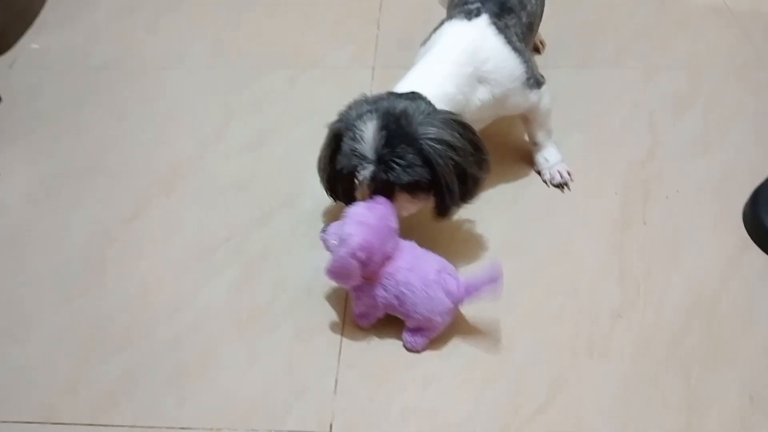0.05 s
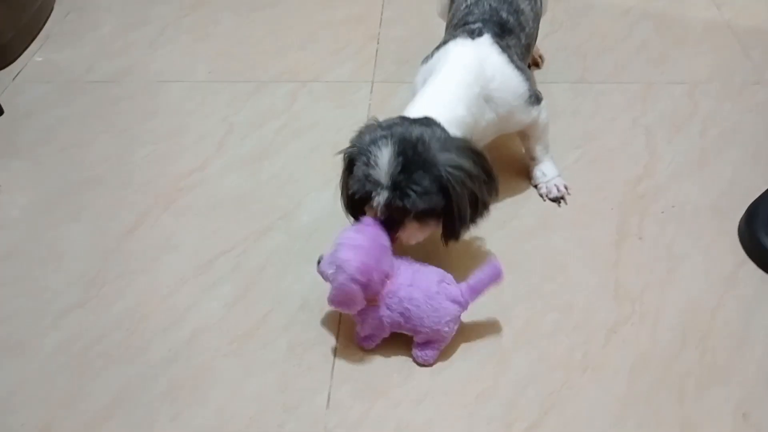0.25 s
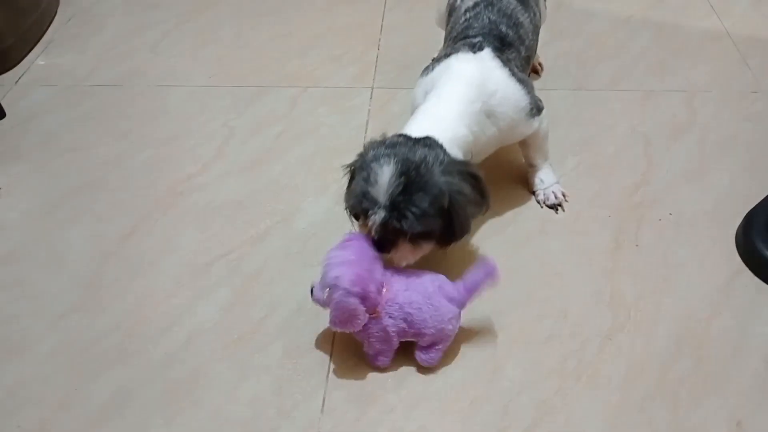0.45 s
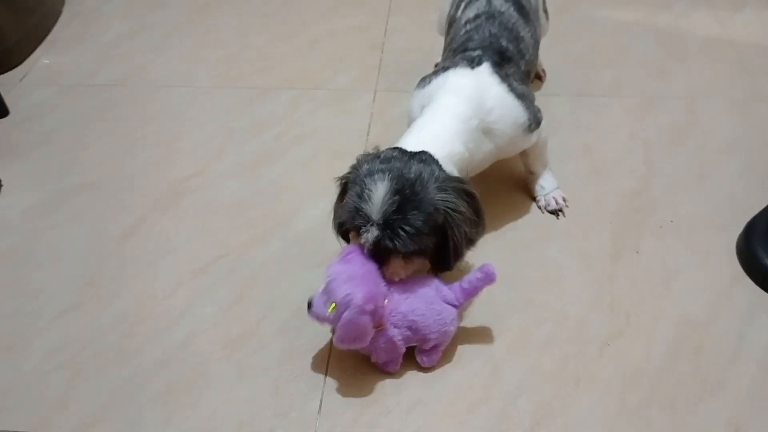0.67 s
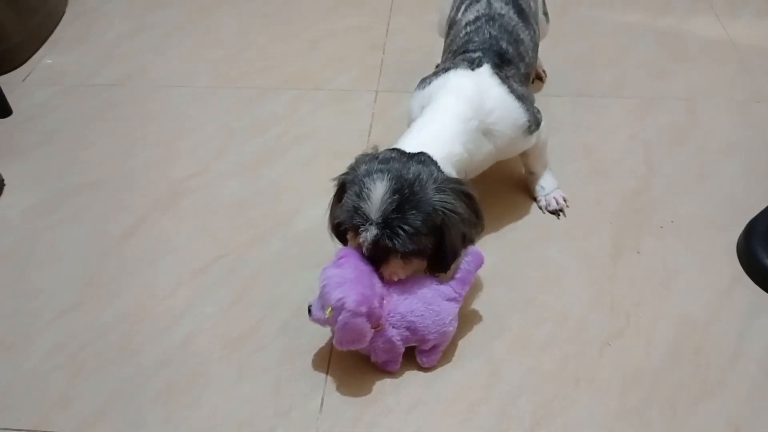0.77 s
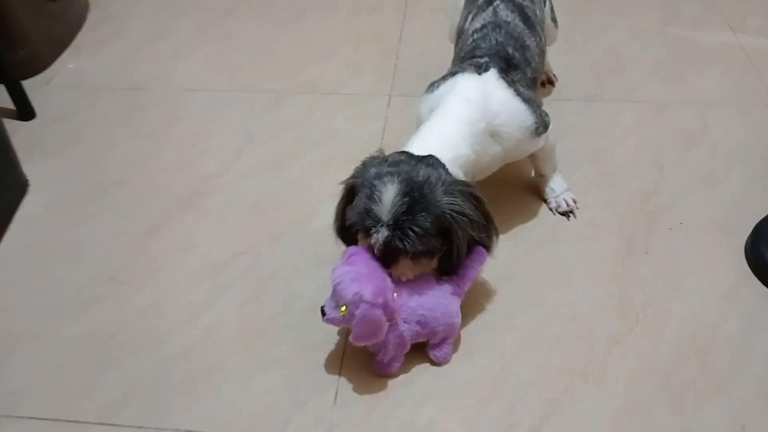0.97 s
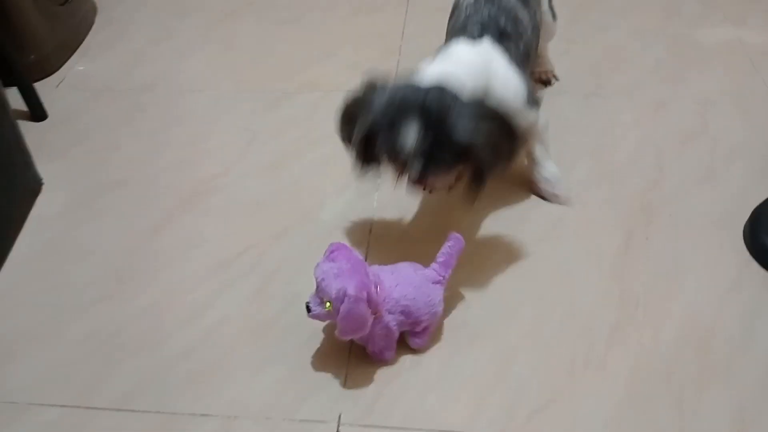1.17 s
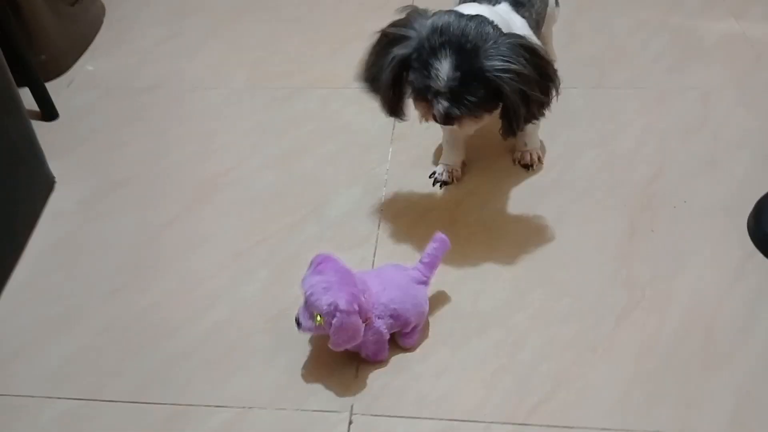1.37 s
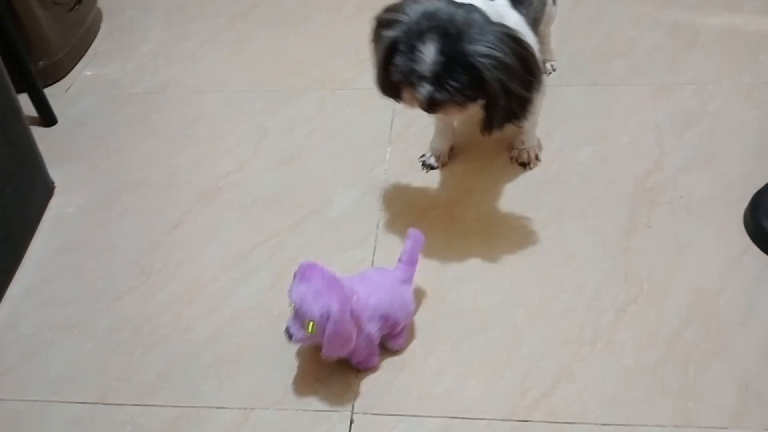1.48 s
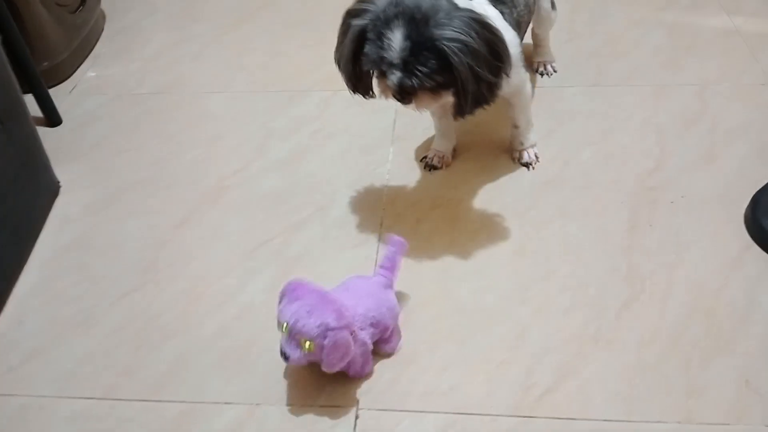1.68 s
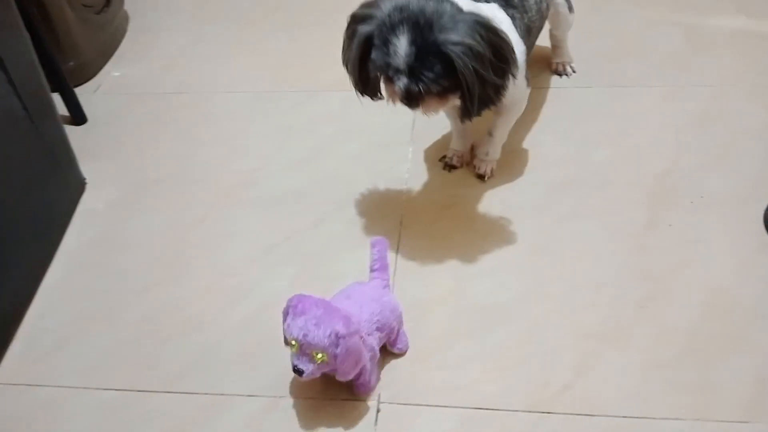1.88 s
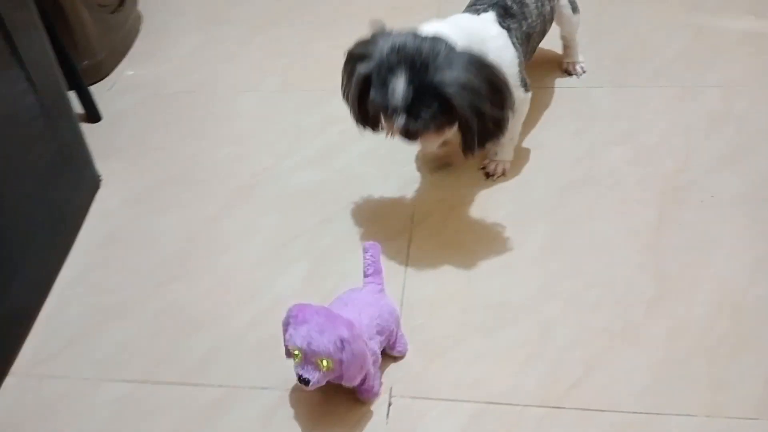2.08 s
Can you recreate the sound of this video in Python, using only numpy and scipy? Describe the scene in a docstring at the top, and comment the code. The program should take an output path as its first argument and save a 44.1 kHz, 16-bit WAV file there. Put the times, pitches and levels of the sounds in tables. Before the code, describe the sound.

A toy dog's loud, shrill reed yaps repeat about eight times a second, then stop; knocks and a much quieter pulsing gear rattle follow, with thin squeaks, close up in a small hard tiled room.

```python
"""In a small, hard room with a tiled floor, a battery-powered plush puppy yaps, then walks.
A cam squeezes a bellows about eight times a second; each puff sounds a shrill reed (harmonics plus air noise).
Then the gearbox shifts to walking: filtered clicks rattle in surges, noise bursts knock, an axle squeaks (sine).
A motor hums throughout as two beating tones, over low room hum and steady noise."""
import sys
import numpy as np
from scipy import signal
from scipy.fft import rfft, irfft
from scipy.io import wavfile
from scipy.ndimage import uniform_filter1d, minimum_filter1d

SR = 44100
rng = np.random.default_rng(int(sys.argv[2]) if len(sys.argv) > 2 else 0)


def materialize(psi):
    """Save the field psi as 16-bit PCM at rate SR to the path in sys.argv[1].

    A 1-D psi becomes a single channel; in a 2-D psi each row is a channel.
    """
    bounded = np.clip(np.atleast_2d(psi).T, -1, 1)
    quanta = np.round(bounded * 32767).astype(np.int16)
    wavfile.write(sys.argv[1], SR, quanta)


N = 94241
LEAD = SR // 4  # samples run before time 0, dropped at the end: the toy is already running
TIME = np.arange(-LEAD, N) / SR
SIZE = len(TIME)


def from_db(db):
    """Decibels to amplitude gain."""
    return 10 ** (np.asarray(db) / 20)


def rms_one(x):
    """Scale to unit power."""
    return x / np.sqrt(np.mean(x ** 2) + 1e-20)


def at_hz(points, hz):
    """Interpolate a (frequency, value) table on a log-frequency axis."""
    table_hz, values = np.transpose(points)
    return np.interp(np.log(np.maximum(hz, 1)), np.log(table_hz), values)


def colour(x, points):
    """Minimum-phase filter of unit power gain; folding the cepstrum makes it causal."""
    size = 4096
    gain = rms_one(from_db(at_hz(points, np.fft.rfftfreq(size, 1 / SR))))
    cepstrum = irfft(np.log(gain))
    cepstrum[1:size // 2] *= 2
    cepstrum[size // 2 + 1:] = 0
    impulse_response = irfft(np.exp(rfft(cepstrum)))
    return signal.fftconvolve(x, impulse_response)[:len(x)]


def drift(rate_hz):
    """Random wander of unit RMS: white noise through a double-pole lowpass at rate_hz."""
    pole = np.exp(-2 * np.pi * rate_hz / SR)
    noise = rng.standard_normal(SIZE + LEAD)
    return rms_one(signal.lfilter([1], [1, -2 * pole, pole * pole], noise)[LEAD:])


def turn(hz):
    """Phase [rad] of a moving frequency."""
    return 2 * np.pi * np.cumsum(hz) / SR


def arch(start_s, length_s):
    """Half a sine, zero outside."""
    return np.maximum(np.sin(np.pi * np.clip((TIME - start_s) / length_s, 0, 1)), 0)


# bellows puffs: (start [s], length [s], level [dB], top pitch [Hz])
PUFFS = [(-0.048, 0.051, -13, 1003), (0.082, 0.056, -14, 1021), (0.209, 0.064, -14.5, 1005),
         (0.345, 0.047, -12.5, 1002), (0.475, 0.055, -14.5, 993.7), (0.606, 0.054, -15, 1005),
         (0.735, .054, -14.5, 1005), (0.869, 0.047, -14, 1013)]
# reed in its housing: (frequency [Hz], relative level [dB])
REED_COLOUR = [(600, -40.5), (1000, -22.5), (1250, -27.5), (1900, -13.5), (2250, -20), (2700, -6.5),
               (3020, -11.5), (3400, -19.5), (4000, -6), (4300, -14), (4900, -0.5), (5350, 2.5), (5900, 1),
               (6400, -3), (6900, -4.5), (7500, -11.5), (8100, -12.5), (9100, -7.5), (10500, -16.5),
               (12200, -12.5), (14000, -18.5), (15500, -28)]
SLACK_HZ = 169.6  # pitch drop at no pressure
PRESSURE_POWER = 1.24  # loudness against pressure
REED_JITTER, REED_SHIMMER_DB = 0.0089, 3  # RMS pitch fraction, RMS level
PARTIAL_FLICKER_DB = 1  # RMS, independent per harmonic
AIR_DB = 0  # against the harmonics before shimmer


def reed():
    """Puff pressure bends the reed's pitch up and down; air hisses through the gap once per cycle."""
    hz = np.full(SIZE, 1000.)
    level = np.zeros(SIZE)
    for start_s, length_s, db, top_hz in PUFFS:
        pressure = arch(start_s, length_s)
        sounding = (TIME > start_s) & (TIME < start_s + length_s)
        hz = np.where(sounding, top_hz - SLACK_HZ * (1 - pressure), hz)
        level += from_db(db) * pressure ** PRESSURE_POWER
    phase = turn(hz * (1 + REED_JITTER * drift(249)))
    harmonics = sum(np.cos(k * phase) * from_db(PARTIAL_FLICKER_DB * drift(115)) for k in range(1, 18))
    slaps = rms_one(harmonics) * from_db(REED_SHIMMER_DB * drift(270))
    air = rms_one(rng.standard_normal(SIZE) * (1 + np.cos(phase)))
    return colour(level * (slaps + from_db(AIR_DB) * air), REED_COLOUR)


HOUSING_ECHO = 0.44  # allpass coefficient


def housing(x):
    """Short shell reflections, as three allpasses in series, smear the reed's slaps."""
    for lag in (7, 17, 31):  # samples
        a = np.r_[1, np.zeros(lag - 1), -HOUSING_ECHO]
        x = signal.lfilter(a[::-1], a, x)
    return x


# gear surges under the legs' load: (time [s], level [dB])
GEAR_SURGES = [(0.944, -34.5), (1.012, -34.5), (1.093, -36), (1.185, -36), (1.265, -36.5), (1.348, -34.5),
               (1.428, -37), (1.512, -36), (1.59, -36.5), (1.676, -36), (1.751, -37.5), (1.843, -33.5),
               (1.935, -38.5), (2.001, -34.5), (2.085, -37)]
# plastic gearbox: (frequency [Hz], relative level [dB])
GEARBOX_COLOUR = [(150, -35), (400, -22), (800, -9.5), (1200, -13.5), (1520, 0), (1730, -6.5), (2060, 0.5),
                  (2350, 0), (2720, 4), (3100, -3.5), (3500, -8.5), (4100, -6.5), (6000, -11), (7200, -10),
                  (9000, -8.5), (11000, -26.5), (13300, -7), (15500, -19)]
TEETH_PER_S, TOOTH_SPREAD_DB = 2500, 0.5
WALK_START_S, SHIFT_S = 0.9, 0.02  # leg gears engage over the SHIFT_S before WALK_START_S
GEAR_DB, IDLE_GEAR_DB = -42, -4.5  # steady level when walking; change before the shift
SURGE_S = 0.016  # Gaussian sigma, in power


def gears():
    """Teeth click densely into the gearbox, harder once the legs engage and in each surge."""
    hits = rng.random(SIZE) < TEETH_PER_S / SR
    signs = rng.choice([-1, 1], SIZE)
    clicks = hits * signs * from_db(TOOTH_SPREAD_DB * rng.standard_normal(SIZE))
    idle = np.clip((WALK_START_S - TIME) / SHIFT_S, 0, 1)
    steady_power = from_db(GEAR_DB + IDLE_GEAR_DB * idle) ** 2
    surge_power = sum(from_db(db) ** 2 * np.exp(-.5 * ((TIME - s) / SURGE_S) ** 2)
                      for s, db in GEAR_SURGES)
    return colour(rms_one(clicks) * np.sqrt(steady_power + surge_power), GEARBOX_COLOUR)


# motor course: (time [s], rotor tone [Hz], level [dB])
MOTOR_COURSE = [(0, 280, -57.5), (0.9, 280.5, -58), (1.1, 280, -50), (1.5, 280, -53.5), (2.14, 278, -55)]
MOTOR_WAVER, MOTOR_FLUTTER_DB = 0.006, 1.2  # RMS pitch fraction, RMS level
SHAFT_HZ, SHAFT_DEPTH = 10.7, 0.45  # crank turns, throb depth
MOTOR_BEAT_HZ, MOTOR_BEAT_DB = 20.3, -4.5  # weaker tone: offset below the rotor's, relative level


def motor():
    """The rotor's tone throbs once per crank turn and beats against a weaker tone just below."""
    s, hz, db = np.transpose(MOTOR_COURSE)
    phase = turn(np.interp(TIME, s, hz) * (1 + MOTOR_WAVER * drift(17.5)))
    throb = 1 + SHAFT_DEPTH * np.cos(turn(SHAFT_HZ * (1 + 0.067 * drift(4.3))))
    rotor = throb * np.sin(phase)
    lower_tone = from_db(MOTOR_BEAT_DB) * np.sin(phase - 2 * np.pi * MOTOR_BEAT_HZ * TIME)
    level = from_db(np.interp(TIME, s, db) + MOTOR_FLUTTER_DB * drift(19))
    return level * (rotor + lower_tone)


# room hum: (time [s], low tone level [dB], middle tone level [dB], high tone level [dB])
HUM_LEVELS = [(0, -103, -92, -62.5), (0.55, -78, -75, -80.5), (0.95, -80, -63.5, -70),
              (1.35, -77, -69, -68), (1.7, -70, -59.5, -64.5), (1.848, -80, -61.5, -61),
              (2.14, -68, -79, -62.5)]
# hum tones: (low [Hz], middle [Hz], high [Hz])
HUM_TONES = (59.2, 113, 164)
# noise floor: (frequency [Hz], relative level [dB])
FLOOR_COLOUR = [(25, -20), (60, -4), (120, -4), (330, -0.5), (700, 1.5), (2000, 3), (6000, -0.5),
                (9000, 1.5), (11000, -6), (13300, -2.5), (15500, -35)]
FLOOR_DB = -43


def background():
    """Three wavering low tones swell and fade over the room's steady, soft noise."""
    s, *levels = np.transpose(HUM_LEVELS)
    hum = np.zeros(SIZE)
    for hz, db in zip(HUM_TONES, levels):
        level = from_db(np.interp(TIME, s, db) + 2 * drift(8.9))
        hum += level * np.sqrt(2) * np.sin(turn(hz * (1 + 0.011 * drift(5.6))))
    return hum + from_db(FLOOR_DB) * colour(rng.standard_normal(SIZE), FLOOR_COLOUR)


# linkage knocks: (time [s], level [dB])
LINKAGE_KNOCKS = [(0.984, -22), (1.010, -24), (1.024, -24), (1.162, -32), (1.499, -39), (1.658, -44)]
# knock spectrum: (frequency [Hz], relative level [dB])
LINKAGE_COLOUR = [(200, -50), (700, -26), (2500, -8), (5000, -2), (7200, 0), (11000, -3), (15500, -25)]
KNOCK_S = 0.0044  # decay to 1/e


def linkage():
    """Levers take up their play: decaying bursts of bright noise."""
    level = sum(from_db(db) * (TIME >= s) * np.exp(-np.abs(TIME - s) / KNOCK_S)
                for s, db in LINKAGE_KNOCKS)
    return colour(level * rng.standard_normal(SIZE), LINKAGE_COLOUR)


# axle squeaks: (start [s], length [s], level [dB])
AXLE_SQUEAKS = [(1.16, .03, -42), (1.333, .10, -38.5), (1.66, 0.02, -37), (1.727, 0.031, -43),
                (1.819, .05, -41.5), (1.878, 0.061, -34.5), (1.989, .035, -36.5), (2.068, .035, -41.5)]
SQUEAK_HZ, SQUEAK_WAVER = 6993, 0.0047  # centre, RMS pitch fraction


def axle():
    """A thin squeak that comes and goes: one sine of wavering pitch."""
    level = sum(from_db(db) * np.sqrt(arch(s, length_s)) for s, length_s, db in AXLE_SQUEAKS)
    return level * np.sqrt(2) * np.sin(turn(SQUEAK_HZ * (1 + SQUEAK_WAVER * drift(120))))


# reverberation: (frequency [Hz], time to fall 60 dB [s])
REVERB_T60 = [(300, 0.59), (1000, 0.69), (2500, 0.61), (5500, 0.26), (9000, 0.42), (15000, 0.2)]
ROOM_DB, ROOM_GAP_S = -3, 0.0037  # tail energy against direct, build-up time
EARLY_DB, EARLY_S = -6, 0.016  # scatter from floor and nearby furniture: energy, decay to 1/e


def room(x, send):
    """Direct sound, quick scatter of near echoes, and a tail with its own decay in each of 12 bands."""
    t = np.arange(SR // 2) / SR
    spectrum = rfft(rng.standard_normal(len(t)))
    hz = np.fft.rfftfreq(len(t), 1 / SR)
    edges_hz = np.geomspace(100, SR / 2, 13)
    tail = np.zeros(len(t))
    for lo, hi in zip(edges_hz, edges_hz[1:]):
        band = irfft(spectrum * (hz >= lo) * (hz < hi), len(t))
        tail += band * from_db(-60 * t / at_hz(REVERB_T60, np.sqrt(lo * hi)))
    tail *= 1 - np.exp(-(t / ROOM_GAP_S) ** 2)
    hits = rng.random(len(t)) < 3000 / SR  # echoes per second
    early = rng.standard_normal(len(t)) * hits * np.exp(-t / EARLY_S)
    echoes = (from_db(ROOM_DB) * rms_one(tail) + from_db(EARLY_DB) * rms_one(early)) / np.sqrt(len(t))
    wet = signal.fftconvolve(send, echoes)[:SIZE]
    return (x + wet) / np.sqrt(1 + np.sum(echoes ** 2))


GEAR_SEND_DB = -5  # works into the echoes, against the yaps


def scene():
    """The toy in the room; yaps excite the room more than the works do; motor and background stay dry."""
    yaps = housing(reed())
    works = gears() + linkage() + axle()
    toy = room(yaps + works, yaps + from_db(GEAR_SEND_DB) * works)
    return (toy + motor() + background())[None, LEAD:]


LIMIT, LIMIT_S = 0.82, 0.002  # peak amplitude, gain window
STOP_HZ = 16050  # 90 dB down from here up


def record(dry):
    """A fast limiter holds down the highest peaks; a steep lowpass cuts the top."""
    size = int(LIMIT_S * SR)
    needed_gain = LIMIT / np.maximum(np.abs(dry), LIMIT)
    gain = uniform_filter1d(minimum_filter1d(needed_gain, size), size)
    lowpass = signal.cheby2(22, 90, STOP_HZ, fs=SR, output="sos")
    return signal.sosfilt(lowpass, dry * gain)


dry = scene()
out = record(dry)
materialize(out)
```